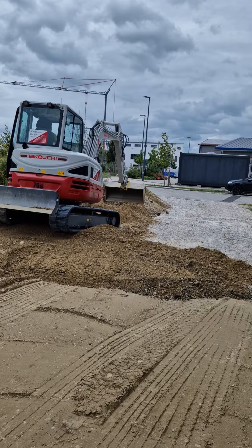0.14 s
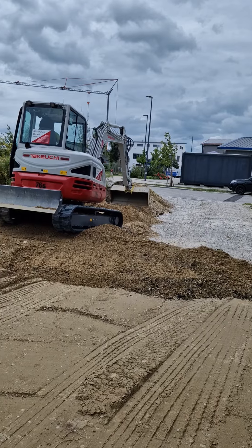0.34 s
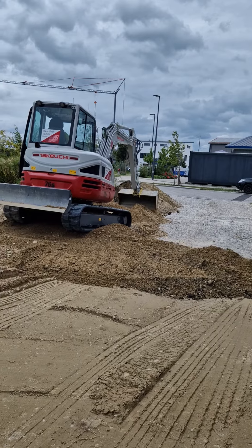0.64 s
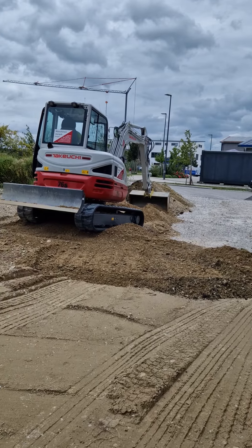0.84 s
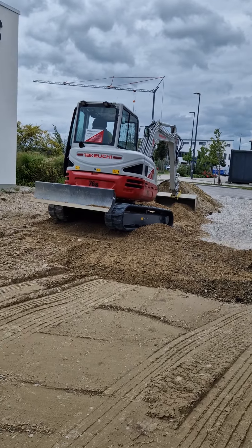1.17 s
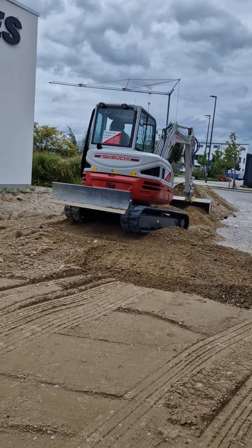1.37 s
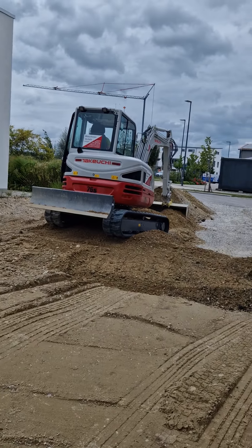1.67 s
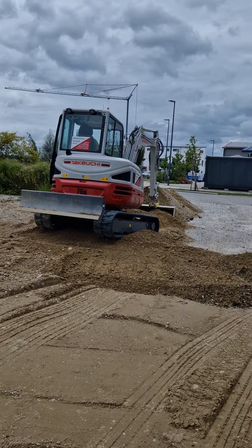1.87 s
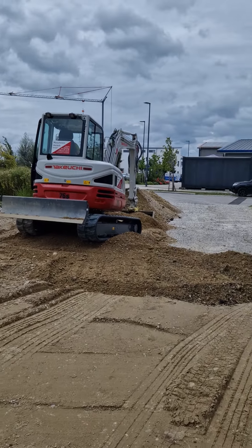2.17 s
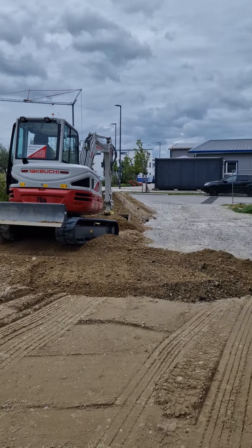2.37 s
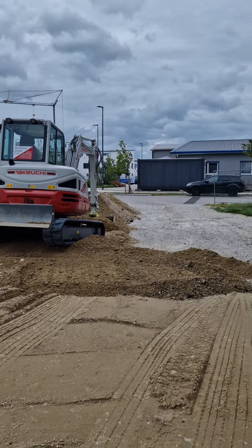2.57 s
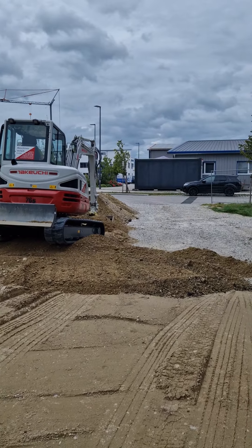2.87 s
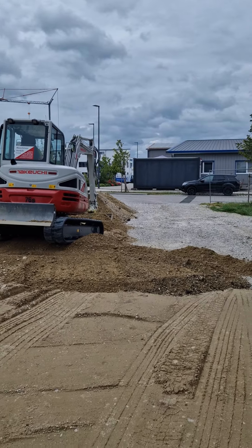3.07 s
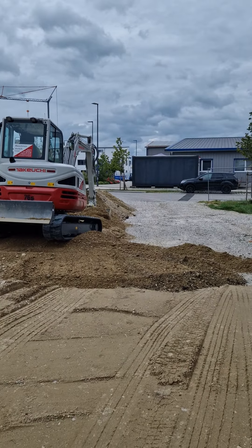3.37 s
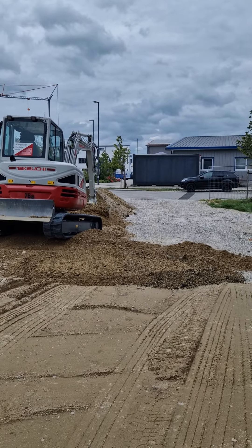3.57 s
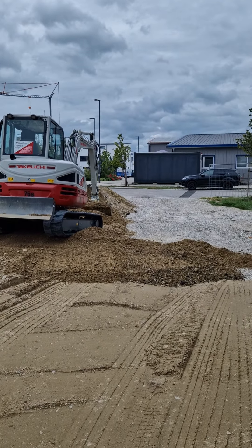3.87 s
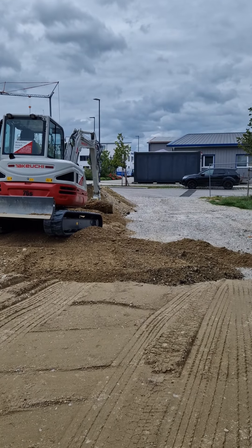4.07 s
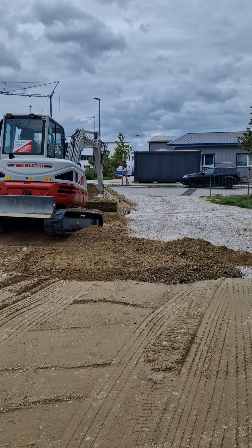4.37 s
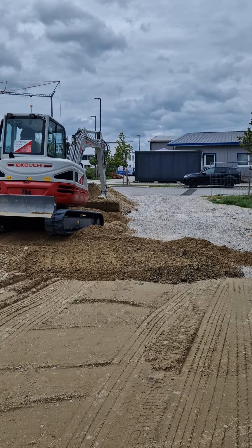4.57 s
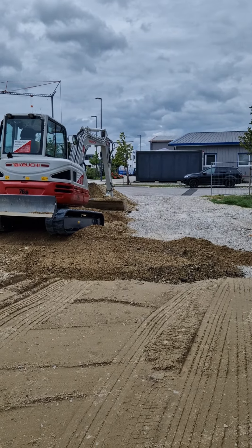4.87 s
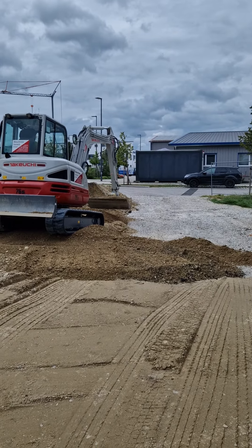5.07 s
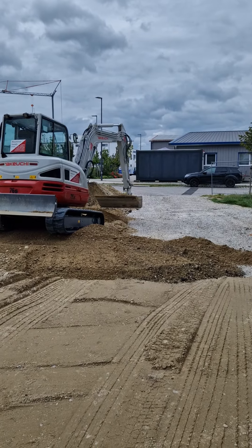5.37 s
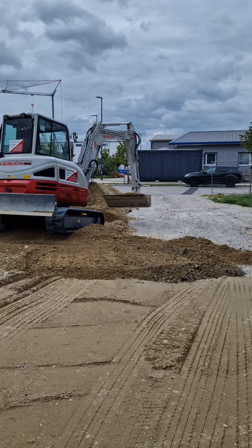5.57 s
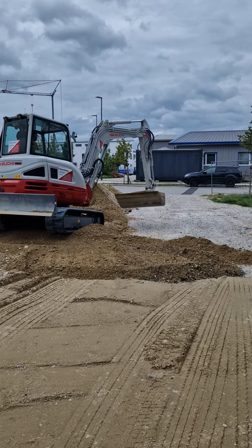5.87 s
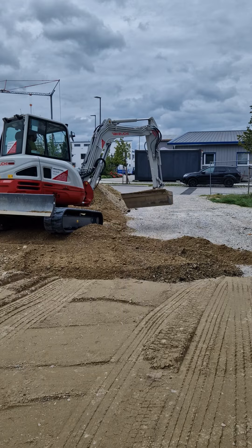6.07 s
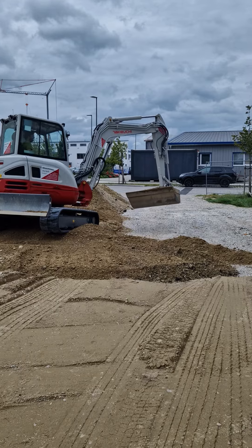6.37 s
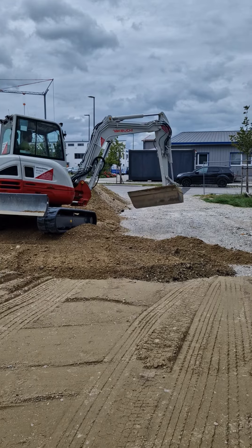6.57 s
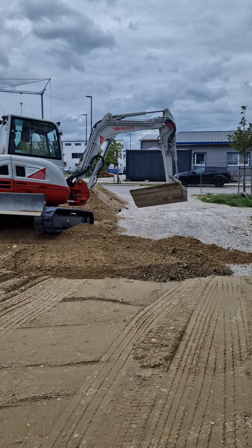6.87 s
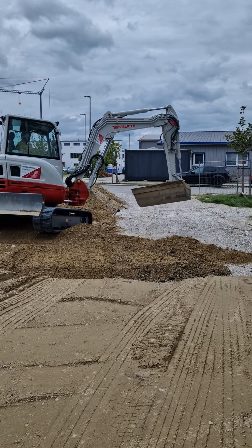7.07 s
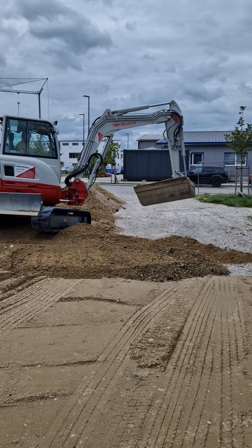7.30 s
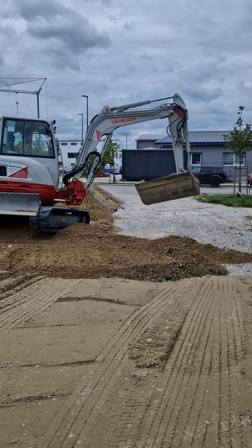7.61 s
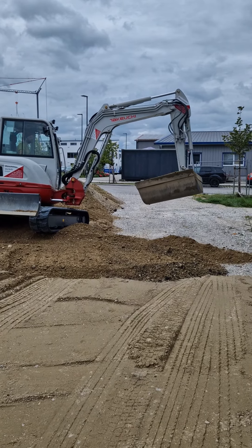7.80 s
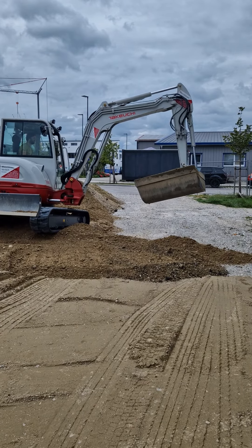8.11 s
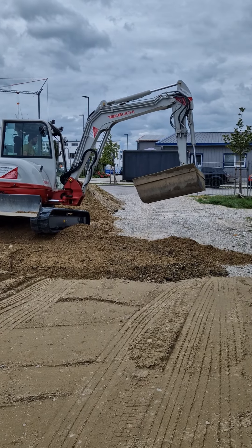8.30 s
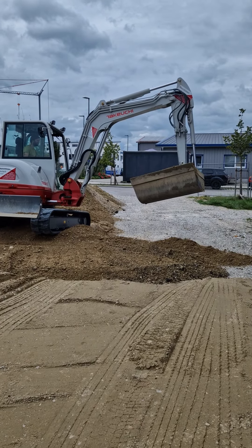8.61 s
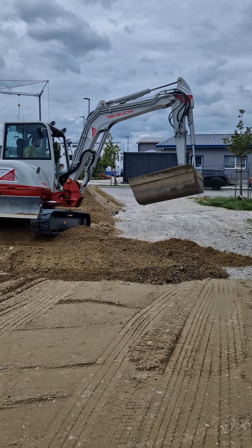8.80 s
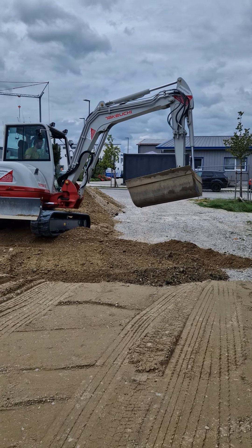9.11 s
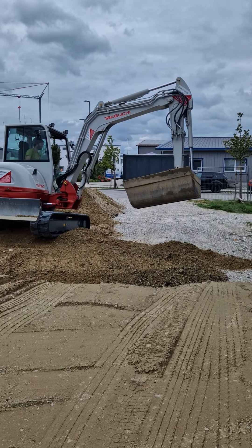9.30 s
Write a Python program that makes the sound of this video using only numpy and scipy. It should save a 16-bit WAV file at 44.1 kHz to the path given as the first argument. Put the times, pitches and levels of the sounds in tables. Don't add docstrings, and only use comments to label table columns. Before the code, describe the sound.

Low droning diesel exhaust and rough fan roar from a mini excavator, thin hydraulic whines, gritty soil hiss, gusty mic rumble, a single knock midway.

```python
import sys
import numpy as np
from scipy import signal
from scipy.fft import rfft, irfft, next_fast_len
from scipy.io import wavfile
from scipy.ndimage import uniform_filter1d

SR = 44100
rng = np.random.default_rng(int(sys.argv[2]) if len(sys.argv) > 2 else 0)


def gain_from_db(level_db):
    decades = np.asarray(level_db, float) / 20
    return 10 ** decades


def wav_record(signal):
    frames = np.transpose(np.atleast_2d(signal))
    bounded = np.clip(frames, -1, 1)
    quanta = np.round(bounded * 32767).astype(np.int16)
    wavfile.write(sys.argv[1], SR, quanta)


N = 416744
TIME = np.arange(N) / SR
SIZE = next_fast_len(N)
HZ = np.maximum(np.arange(SIZE // 2 + 1) * SR / SIZE, 1)
VALVE_EDGE_S = 0.42


def curves(table):
    s, *columns = np.transpose(table)
    return [np.interp(TIME, s, c) for c in columns]


def on_hz(table, hz):
    f, v = np.transpose(table)
    return np.interp(np.log(hz), np.log(f), v, left=v[0], right=v[-1])


def swells(events, edge_s):
    total = 0
    for s, hold, db in events:
        corners = [s - edge_s, s, s + hold, s + hold + edge_s]
        total = total + db * np.interp(TIME, corners, [0, 1, 1, 0])
    return total


def walk(rate):
    steps = np.repeat(rng.standard_normal(int(N / SR * rate) + 3), 8)
    smooth = uniform_filter1d(uniform_filter1d(steps, size=8), size=8)
    return 1.3 * np.interp(TIME * rate * 8, np.arange(len(smooth)), smooth)


def tone(turns, multiple, rough_db, rate):
    phase = 2 * np.pi * (multiple * turns + rng.random())
    return np.sqrt(2) * gain_from_db(rough_db * walk(rate)) * np.sin(phase)


# f/Hz, level/dB
LEFT_OVER_RIGHT = [(60, 1.3), (330, 0.5), (600, 6.5), (760, 2.1), (950, -1.5), (1300, 5.5), (1750, -0.5),
                   (2150, -2), (3900, 8), (4600, -1.5), (5400, 0.5), (6300, 8.5), (8700, 17.5),
                   (12000, 6.5)]
# f/Hz, phase/rad
LEFT_LEAD = [(60, .16), (160, 0.05), (250, 0.52), (500, .4), (720, -0.5), (1050, 0.97), (1400, -0.25),
             (1800, 0.8), (2700, 1.67), (3400, 3.5), (4000, 4.5), (5000, 8), (5700, 8), (9000, 9),
             (15000, 15.5)]


def at_ports(left, other=0, alike=1):
    right = alike * left * np.exp(-1j * on_hz(LEFT_LEAD, HZ)) + np.sqrt(1 - alike ** 2) * other
    return np.array([left, right * gain_from_db(-on_hz(LEFT_OVER_RIGHT, HZ))])


# f/Hz, share/0-1
ALIKENESS = [(40, 0.77), (110, 0.86), (300, 1), (520, 0.61), (750, 0.9), (1100, 0.28), (1500, .45),
             (2000, 0.64), (2700, 0.78), (3200, 0.36), (5200, 0.45), (7000, 0.41), (15000, .15)]


def ports():
    a, b = rfft(rng.standard_normal((2, SIZE)))
    return at_ports(a, b, np.clip(on_hz(ALIKENESS, HZ), 0, 1))


def coloured(spectra, table, lo_hz, hi_hz):
    gain = gain_from_db(on_hz(table, HZ)) * (HZ > table[0][0]) * (HZ < table[-1][0])
    inside = (HZ > lo_hz) & (HZ < hi_hz)
    return irfft(spectra * gain, SIZE)[:, :N] / np.sqrt(np.sum(gain[inside] ** 2) / len(HZ))


def band(hz, width_hz):
    ring = irfft(ports() / (1 + ((HZ - hz) / width_hz) ** 4), SIZE)[:, :N]
    return ring / np.std(ring[0])


# t/s, turned away/0-1, ground echo delay/ms
CAB_TURN = [
    (0, 0.05, 0.72),
    (2, 0.3, .73),
    (3.3, 0.5, 0.73),
    (4, 0.15, 0.74),
    (5, 0.4, 0.72),
    (6, 0.4, 0.7),
    (7, 0.68, 0.727),
    (8.3, 1, 0.72),
    (8.6, 0.82, 0.71),
    (9.45, 1, 0.92),
]


def cab():
    return curves(CAB_TURN)


# t/s, length/s, change/dB
LEVER_EASES = [
    (.5, 0.21, -8),
    (2.05, 0.427, -17),
    (2.78, 0.028, -7.5),
    (3.48, 0.065, -3),
    (3.78, .04, -1.5),
    (5.44, 0.027, -1),
    (6.93, 0.072, -2),
]


def eases():
    return swells(LEVER_EASES, edge_s=0.04)


# t/s, firing rate/Hz
FIRING_RATE = [(0, 81.2), (.7, 80.7), (1.4, 81), (2.1, 80.9), (3, 80.7), (3.5, 81.2), (4, 80.75),
               (4.45, 81.2), (4.9, 80.4), (5.4, 81), (6.3, 80.75), (7.8, 80.95), (9.45, 80.9)]


def crank():
    return np.cumsum(curves(FIRING_RATE)[0]) / SR


# t/s, level/dB
BOOM_LOAD = [(0, -19), (.45, -19.5), (.84, -14.5), (1.15, -19.5), (1.35, -16.5), (1.6, -15.5), (2.0, -14.5),
             (2.55, -18.5), (2.9, -17.5), (3.08, -13), (3.63, -15), (3.85, -18.5), (4.1, -14.5), (4.6, -17),
             (4.72, -12), (5.5, -13.5), (7.4, -13), (9.45, -14.5)]
# t/s, length/s, change/dB
MISFIRES = [(.605, .01, -10), (.64, 0.014, 5), (.7, .01, -3), (1.28, .015, -5), (1.38, 0.0088, 1.5),
            (2.11, 0.038, 7.5), (2.29, 0.037, 7.5), (3.96, .02, -5), (4.44, 0.011, -12), (8.07, .01, -2),
            (9.07, .02, -3), (9.25, .01, -1)]
# t/s, octave level/dB, lean/rad
PULSE_SHAPE = [(0, -38.5, 3.6), (.75, -32.5, 3.4), (1.15, -29, 3.1), (1.95, -26, 4.8), (2.3, -28, 4.7),
               (3.2, -22.5, 5.3), (4.0, -27, 4.6), (4.4, -25.5, 4.2), (4.82, -29.5, 4.4), (5.3, -24.5, 4.3),
               (5.95, -27, 3.2), (6.5, -34.5, 3.1), (7.25, -31, 5.5), (8.1, -28, 2.3), (8.45, -31, 2.3),
               (9.45, -29.5, 2.5)]
# multiple of firing rate, level under the boom/dB
WEAK_ORDERS = [(.5, -34), (.75, -26), (1.25, -22), (1.5, -30), (1.75, -30), (2.25, -29), (2.5, -31),
               (3, -31), (4, -36.5)]


def exhaust(turns):
    ease_db = eases()
    boom_db = curves(BOOM_LOAD)[0] + ease_db + swells(MISFIRES, edge_s=0.026)
    octave_db, lean = curves(PULSE_SHAPE)
    strength = gain_from_db((.75 - .17 * ease_db) * walk(36))
    swing = 2 * np.pi * turns + .035 * walk(50)
    boom = gain_from_db(boom_db) * strength * np.cos(swing)
    octave_db = octave_db + .15 * ease_db + 1.2 + .6 * walk(35)
    octave = gain_from_db(octave_db) * np.cos(2 * swing + lean)
    weak = sum(gain_from_db(db) * tone(turns, k, rough_db=2.5, rate=6.) for k, db in WEAK_ORDERS)
    return gain_from_db(0.43) * np.sqrt(2) * (boom + octave) + gain_from_db(0.43 * boom_db - 8.5) * weak


# multiple of pump rate, level facing/dB, level turned away/dB
GEAR_LINES = [(1, -40.5, -51.5), (2, -43.5, -45), (3, -45, -60)]
# multiple of pump rate, level facing/dB, level turned away/dB
PISTON_LINES = [(1, -54, -47.5), (2, -51.5, -57.5), (2.6, -52, -57.5), (3, -53, -49), (5, -49, -51)]
# t/s, length/s, change/dB
GEAR_VALVES = [
    [(2.1, .1, -7), (3.06, 0.08, 5), (6.2, 0.92, 4.5), (8.3, .5, -7)],
    [(2.1, .4, 5), (3.06, 0.13, 7.5), (3.9, 0.088, 5.5), (5.3, 0.28, 6), (6.8, .1, 4), (7.75, 1.48, 7)],
]
# t/s, length/s, change/dB
PISTON_VALVES = [
    [(1.2, 0.56, 1), (2.5, .1, -2), (5.0, 0.43, 6.5), (6.3, .1, 12), (7.75, 0.083, 2)],
    [(1.2, .5, 6.1), (2.55, 0.82, 9.5), (5.4, .1, 4), (7.0, .8, 4)],
    [(2.2, .1, 3), (5.5, .2, 3.2), (6.7, .9, 7.3)],
    [(0, 0.18, 4), (1.65, 0.15, 4), (2.7, .1, 3.5), (6.5, 0.57, 6.4), (7.8, 0.071, 2.7), (8.7, .1, 3.1)],
    [(1.0, .9, 3.2), (4.0, .4, 5), (5.3, .5, 3.4)],
]


def pumps(turns):
    away = cab()[0]
    odd_db, even_db = (swells(table, VALVE_EDGE_S) for table in GEAR_VALVES)
    lines = []
    for k, facing_db, away_db in GEAR_LINES:
        valve_db = odd_db if k % 2 else even_db
        lines.append((4.535 * k, facing_db + away * (away_db - facing_db) + valve_db))
    for (k, facing_db, away_db), table in zip(PISTON_LINES, PISTON_VALVES):
        valve_db = swells(table, VALVE_EDGE_S)
        lines.append((5 * k, facing_db + away * (away_db - facing_db) + valve_db))
    return sum(gain_from_db(db + 1.5 + walk(2)) * tone(turns, k, rough_db=.9, rate=14.) for k, db in lines)


# t/s, length/s, rise/dB
SOIL_SPURTS = [(.29, .05, 0), (.76, .02, 0), (1.3, 0.11, 1.5), (2.03, .01, 0), (2.53, .01, 4),
               (2.9, .04, 2), (3.26, .04, 5), (3.81, .02, 1), (3.97, 0.1, 2), (4.32, .03, 3),
               (4.66, .02, 0), (4.82, .01, -2), (5.05, 1.4, 1), (7.4, .2, 1.5), (8.6, .02, 1),
               (9.0, .02, 0)]


def soil():
    return swells(SOIL_SPURTS, edge_s=0.038)


# f/Hz, level/dB per Hz
HOOD_FACING = [(330, -9), (500, -7), (640, 3.5), (800, -6), (950, -9), (1150, -3.5), (1500, -6),
               (1700, -9.5), (2050, -9), (2600, -9.5), (3900, -14.5), (6200, -18), (7600, -16.5),
               (8800, -31.5)]
# f/Hz, level/dB per Hz
HOOD_TURNED = [(330, -6), (560, -10.5), (740, -3), (850, -5.5), (980, -11), (1150, -9.5), (1400, -4.5),
               (1700, -11), (2050, -12.5), (2600, -13.5), (3400, -18), (6200, -17.5), (7700, -22.5),
               (8800, -35.5)]
# t/s, roar level/dB
HOOD_EFFORT = [(0, -32.5), (.3, -32), (1.45, -30.5), (2.65, -32), (2.95, -31), (3.4, -32), (3.95, -31),
               (4.3, -30.5), (4.74, -32), (5.4, -31), (6.0, -31), (7.66, -30), (8.3, -31.5), (9.45, -33.5)]


def hood(turns):
    roar_db = curves(HOOD_EFFORT)[0]
    away = cab()[0]
    soil_db = soil()
    spectra, out = ports(), 0
    flat = gain_from_db(on_hz(HOOD_FACING, HZ) / 2 + on_hz(HOOD_TURNED, HZ) / 2)
    norm = np.sqrt(np.sum(flat[(HZ > 500) & (HZ < 2800)] ** 2) / len(HZ))
    beat = np.cos(2 * np.pi * turns + 1.1)
    beat = beat + .5 * np.cos(4 * np.pi * turns) + .3 * np.cos(np.pi / 2 * turns)
    shared = walk(6.6)
    for hz in 330 * 2 ** np.arange(0, 5, .25):
        window = np.clip(1 - 4 * np.abs(np.log2(HZ / hz)), 0, 1)
        high = np.clip(np.log2(hz / 2200), 0, 1)
        db = (away - .5) * (on_hz(HOOD_TURNED, hz) - on_hz(HOOD_FACING, hz))
        db = db + high * (-.5 - 0.13 * (roar_db + 31) + 0.37 * soil_db)
        db = db + (.55 - .15 * high) * beat
        db = db + .45 * high * shared + .6 * walk(1.5) + .5 * walk(11)
        out = out + gain_from_db(db) * irfft(spectra * flat * window, SIZE)[:, :N]
    return out / norm * gain_from_db(roar_db + 1.38)


# t/s, length/s, share
BOOM_RETURN = [
    (6.0, 1.8, .2),
]


def echoes(sound):
    lag = cab()[1] / 1000

    def delayed(s):
        return np.array([np.interp(TIME - s, TIME, side) for side in sound])

    ground = 0.072 * delayed(lag)
    frame = 0.046 * delayed(2 * lag)
    boom = swells(BOOM_RETURN, VALVE_EDGE_S) * delayed(.00147)
    return sound - ground + frame + boom


# f/Hz, level/dB per Hz
DRONE_COLOUR = [(40, -33), (62, -10), (82, 6), (105, 11.5), (135, 4.5), (200, 3), (250, -4.5), (310, -0.5),
                (420, -16.5), (520, -18.5)]
# t/s, length/s, rise/dB
TRACK_JOLTS = [(.84, 0.0092, 5.5), (1.3, 0.11, 2), (1.98, .02, 8.5), (2.68, .01, 0), (3.645, .01, 11),
               (3.75, .85, 2.5), (4.13, .01, 3), (4.7, 0.37, 2.5), (5.6, 0.043, 2), (6.82, .01, 4),
               (8.58, 0.022, 5)]


def drone():
    db = -34 - 3.5 * cab()[0] + .23 * eases() + swells(TRACK_JOLTS, edge_s=0.032)
    return coloured(ports(), DRONE_COLOUR, 183, 356) * gain_from_db(db + 0.51 * walk(14))


# f/Hz, level/dB per Hz
WIND_COLOUR = [(12, -14), (25, -5), (48, -1), (70, -1.5), (120, -22), (250, -37)]
# t/s, length/s, rise over the calm/dB
WIND_GUSTS = [(0, .02, 16), (.7, 0.15, 19), (1.0, .2, 21), (1.3, .12, 25.5), (1.92, .1, 16),
              (2.16, .03, 14), (2.68, 0.084, 18), (3.08, .02, 9), (3.35, .04, 19), (3.62, 0.12, 18),
              (3.84, .1, 16), (4.13, 0.15, 15), (5.05, .03, 12), (5.8, .04, 8), (6.4, .35, 7),
              (6.82, 0.24, 11), (7.21, .05, 11), (7.63, .03, 11), (8.5, 0.12, 20), (8.97, .01, 10),
              (9.08, 0.022, 28), (9.26, .02, 28), (9.44, .02, 15)]


def breeze():
    db = -48.5 + swells(WIND_GUSTS, edge_s=0.1) + 2.3 * walk(9)
    return coloured(ports(), WIND_COLOUR, 20, 62) * gain_from_db(db)


# f/Hz, level/dB per Hz
GRIT_COLOUR = [(7000, -18), (8300, -2.5), (9800, 1.5), (12000, -.6), (14500, -1.5), (15750, -1)]


def scrape(turns):
    level_db = -54.5 - 9 * cab()[0] + soil()
    flicker_db = .4 * walk(12) + .8 * walk(70)
    ticks_db = .6 * np.cos(2 * np.pi * turns + 1.1)
    return coloured(ports(), GRIT_COLOUR, 9800, 13500) * gain_from_db(level_db + 5.0 + flicker_db + ticks_db)


# t/s, length/s, rise/dB
PUMP_STRAINS = [
    (.9, 1.1, 14),
    (2.5, .3, 4.7),
    (3.95, .4, 7),
    (5.3, 2.4, 2.5),
]
# t/s, length/s, rise/dB
OIL_FLOWS = [
    (.95, .4, 19),
    (4.0, .4, 8),
    (5.7, 1.0, 8),
]


def panel(turns):
    shake_db = swells(PUMP_STRAINS, VALVE_EDGE_S / 2) + 2.2 * walk(12) + np.cos(2 * np.pi * turns + 1.1)
    hiss_db = swells(OIL_FLOWS, VALVE_EDGE_S / 2) + 1.2 * walk(9)
    sheet = band(hz=2076, width_hz=200) * gain_from_db(-53.5 + shake_db)
    valve = band(hz=3320, width_hz=600) * gain_from_db(-60 + hiss_db)
    return sheet + valve


# t/s, peak level/dB, f/Hz, t60/s
STONES = [
    (4.405, -14.5, 676, 0.033),
    (4.331, -38, 3850, .025),
    (4.337, -38, 5100, .025),
    (1.74, -39, 4630, .02),
]


def knock():
    out = np.zeros(N)
    for s, db, hz, t60 in STONES:
        t = np.maximum(TIME - s, 0)
        attack = 1 - np.exp(-t / 0.00087)
        decay = np.exp(-np.log(1000) * t / t60)
        out -= gain_from_db(db + 2.0) * attack * decay * np.sin(2 * np.pi * hz * t)
    return out


def scene():
    turns = crank()
    points = exhaust(turns) + pumps(turns) + knock()
    direct = irfft(at_ports(rfft(points, SIZE)), SIZE)[:, :N]
    body = echoes(hood(turns) + panel(turns) + scrape(turns))
    return direct + body + drone() + breeze()


def band_limit(x):
    return signal.sosfilt(signal.butter(12, 15790, fs=SR, output="sos"), x)


def record(dry):
    return band_limit(dry)


dry = scene()
out = record(dry)
wav_record(out)
```